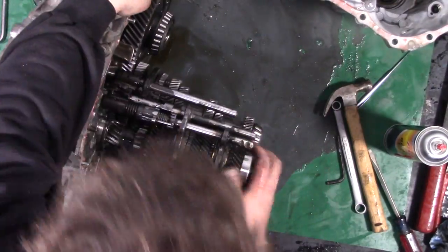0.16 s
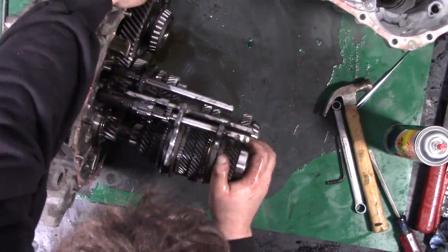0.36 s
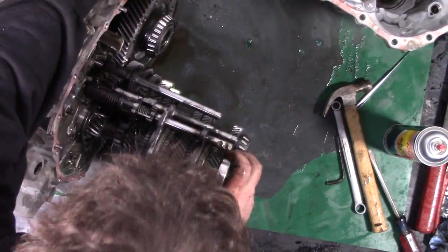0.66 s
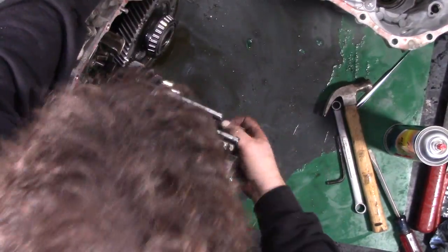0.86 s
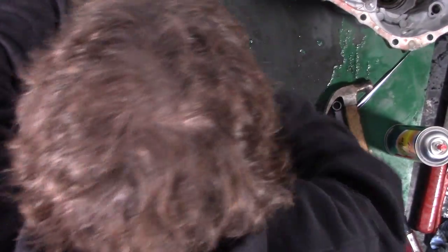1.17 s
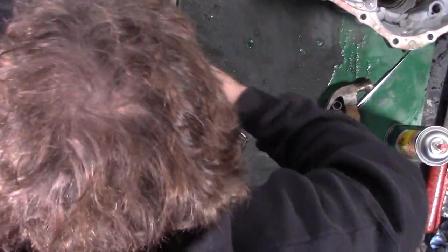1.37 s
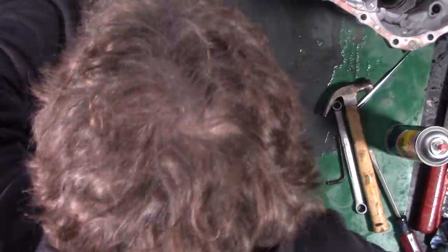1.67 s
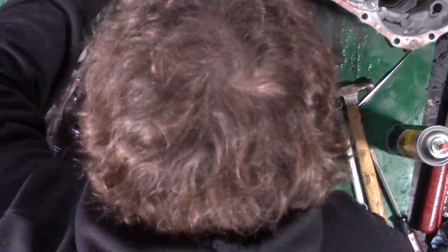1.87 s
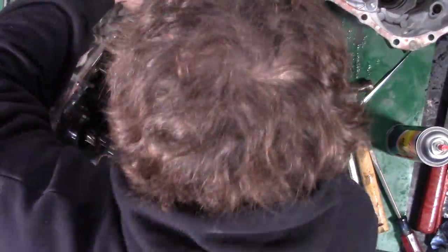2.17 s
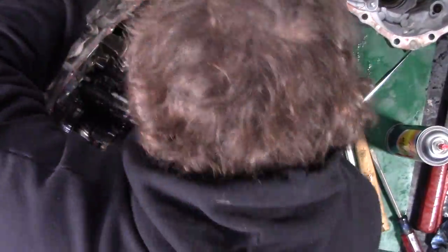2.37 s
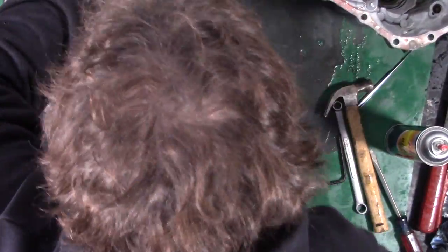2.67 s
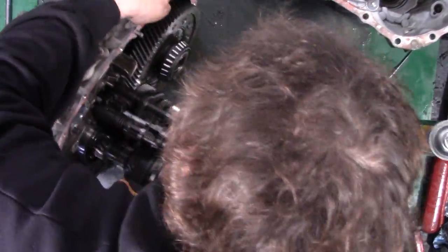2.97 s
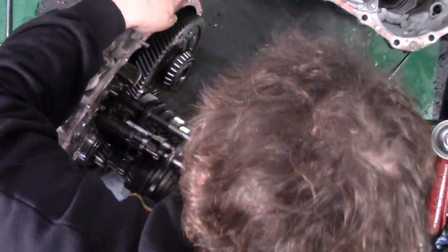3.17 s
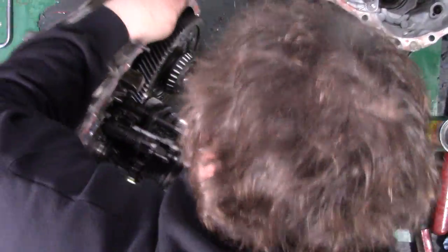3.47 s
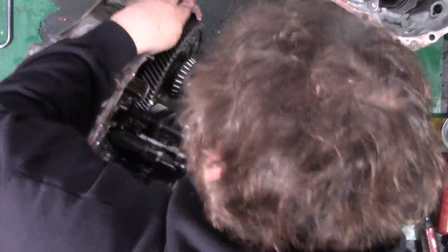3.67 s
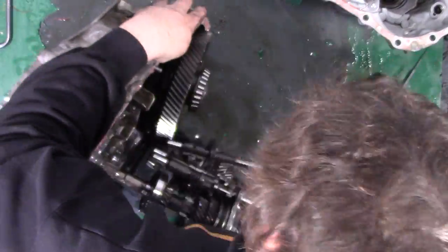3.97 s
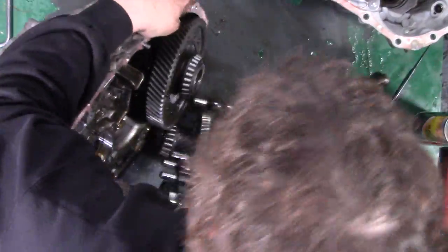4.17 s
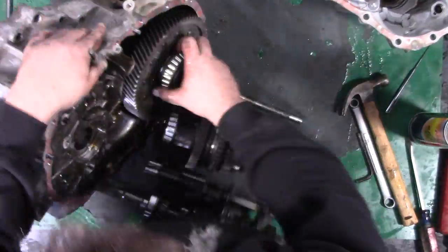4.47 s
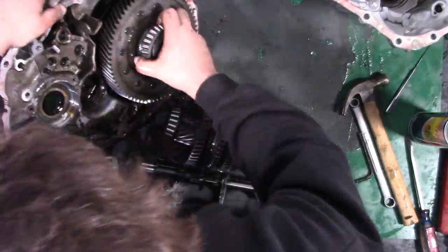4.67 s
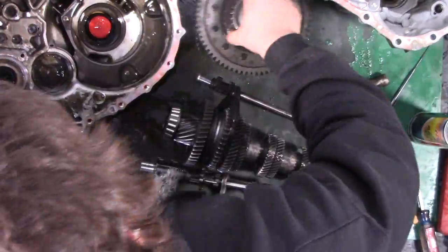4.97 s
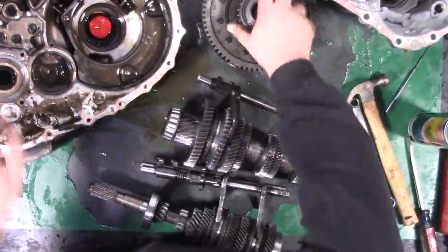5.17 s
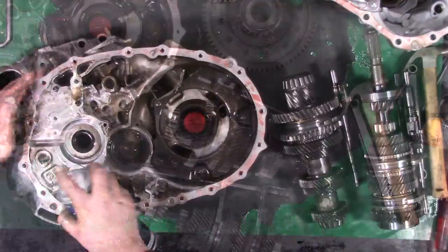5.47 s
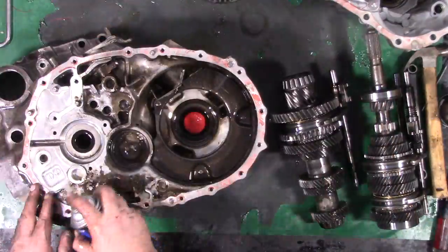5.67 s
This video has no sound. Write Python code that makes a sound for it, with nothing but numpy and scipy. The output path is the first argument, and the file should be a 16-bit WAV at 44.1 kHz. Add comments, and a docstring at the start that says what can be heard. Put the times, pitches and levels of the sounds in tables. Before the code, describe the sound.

Steel gears and shafts are worked loose from a metal case on a workbench, heard close and sped up, so each contact is a brief rattle with its ring cut short. For the first two seconds there are scattered light clinks and dull knocks, clearest near 0.6, 1 and 1.6 seconds. Firmer thuds land around 2.3 to 2.5 seconds. From about 2.7 seconds the parts clatter densely, with a dull rubbing scrape beneath them until 3.9 seconds and sharp ticks of gear teeth, brightest near 3.8. Bright rattling continues to about 4.5 seconds. A few short ringing clanks follow around 4.75, a solid knock at 5 and a faint clink at 5.3. A faint garage hum lies underneath, and everything fades out by about 5.5 seconds.

```python
"""Stripping a gearbox on a garage bench

Gear shafts and rails are worked loose from an alloy case, heard sped up so every ring is cut short.
Each contact is a brief rattle that thuds in the bench, clanks in the case and ticks in the steel teeth.
A few parts ring clear, and midway some drag along each other. The small microphone is close to the work,
with the garage humming below; the sound fades out at the end."""
import sys
import numpy as np
from scipy import signal
from scipy.fft import rfft, irfft, next_fast_len
from scipy.io import wavfile

SR = 44100
rng = np.random.default_rng(int(sys.argv[2]) if len(sys.argv) > 2 else 0)


def master_out(mix):
    """Clip the mix to full scale and print it as 16-bit PCM to the path in sys.argv[1]."""
    frames = np.transpose(np.atleast_2d(mix))
    ceiling = np.clip(frames, -1, 1)
    pcm = np.round(ceiling * 32767).astype(np.int16)
    wavfile.write(sys.argv[1], SR, pcm)


N = 257137
STEP = 32   # samples per point of a slow curve

# Dry grit of metal rubbing. Each row: frequency in Hz, relative spectral density in dB.
GRIT_SPECTRUM = [(40, -18.5), (103, -5), (250, 4), (600, -6.5), (930, -5.5), (1400, -12), (3500, -19.5),
                 (4300, -23.5), (6300, -27.5), (9300, -37), (10500, -42), (15500, -65.5)]


def from_db(db):
    """Amplitude gain of a level in dB."""
    return 10 ** (np.asarray(db) / 20)


def rms_one(x):
    """x scaled to unit rms."""
    return x / np.sqrt(np.mean(x ** 2) + 1e-20)


def in_time(rows):
    """Rows of seconds and value, joined into a curve at every sample."""
    return np.interp(np.arange(N) / SR, *np.transpose(rows))


def coloured(x, spectrum, low_hz=10, high_hz=20000):
    """x shaped by rows of Hz and dB, rolled off outside a band."""
    size = next_fast_len(N)
    hz = np.maximum(np.arange(size // 2 + 1) * SR / size, 1)
    row_hz, row_db = np.transpose(spectrum)
    gain = from_db(np.interp(np.log(hz), np.log(row_hz), row_db))
    skirts = (1 + (low_hz / hz) ** 8) * (1 + (hz / high_hz) ** 8)
    return irfft(rfft(x, size) * gain / np.sqrt(skirts), size)[:N]


def drift(rate_hz):
    """A random wander of about unit rms, mostly slower than rate_hz."""
    r = np.exp(-2 * np.pi * rate_hz * STEP / SR)
    slow = signal.lfilter([1], [1, -2 * r, r * r], rng.standard_normal(N // STEP + 2002))[2000:]
    return np.interp(np.arange(N) / STEP, np.arange(len(slow)), rms_one(slow))


def swells(peak_s, rise_ms, fall_ms):
    """One slow power curve per event: a bell-shaped rise, an exponential fall."""
    ms = 1000 * (np.arange(N // STEP + 2) * STEP / SR - peak_s[:, None])
    rise = np.minimum(ms, 0) / np.maximum(rise_ms, .3)[:, None]
    fall = np.maximum(ms, 0) / np.maximum(fall_ms, .5)[:, None]
    return np.exp(-np.minimum(rise ** 2 + fall, 60))


def amplitude(power):
    """Amplitude at every sample from a slow power curve."""
    return np.interp(np.arange(N) / STEP, np.arange(len(power)), np.sqrt(power))


def garage():
    """Room tone: a soft broadband hum whose lows and highs waver apart."""
    # Colour of the hum. Each row: frequency in Hz, relative spectral density in dB.
    hum_spectrum = [(30, -28), (70, 2), (160, -2.5), (240, 2.5), (330, -0.5), (520, -0.5), (1100, -3),
                    (2700, -8.5), (4800, -14.5), (6000, -19), (9000, -25.5), (15500, -52)]
    # Course of the hum. Each row: time in seconds, level in dB.
    hum_level = [(0, -55), (.5, -53), (2, -54), (4.2, -52), (5.35, -55)]
    lows = coloured(rng.standard_normal(N), hum_spectrum, high_hz=1209) * from_db(0.57 * drift(36.0))
    highs = coloured(rng.standard_normal(N), hum_spectrum, low_hz=1180) * from_db(0.65 * drift(11.0))
    return from_db(in_time(hum_level)) * rms_one(lows + highs)


def rattle(per_s, uneven_db):
    """Tiny knocks of uneven size at random moments; unit rms."""
    sizes = from_db(uneven_db * np.minimum(rng.exponential(1, N), 4)) * rng.choice([-1, 1], N)
    return rms_one(sizes * (rng.random(N) < per_s / SR) + 1e-9)


def resonate(x, hz, width_hz):
    """One damped mode, with unit gain at its peak."""
    r = np.exp(-np.pi * width_hz / SR)
    poles = [1, -2 * r * np.cos(2 * np.pi * hz / SR), r * r]
    return signal.lfilter([(1 - r * r) / 2, 0, (r * r - 1) / 2], poles, x)


def mode_share(modes, centre_hz, reach_octaves):
    """Power share of each mode when a contact lands where the body rings at about centre_hz."""
    octaves = np.log2(np.array(modes)[:, 0] / centre_hz[:, None])
    share = 0.16 + np.exp(-(octaves / reach_octaves) ** 2)
    return share / share.mean(axis=1, keepdims=True)


def body(shapes, level_db, modes, share, knocks, band_hz, ring_db, grit_db, spot_db=3.5):
    """Knocks ring a body's modes over dry grit; each contact hits a new spot and favours other modes."""
    favour = from_db(2 * spot_db * np.clip(rng.standard_normal((len(shapes), len(modes))), -2, 1.3))
    favour *= share / favour.mean()
    power = from_db(2 * (level_db + ring_db))
    power_gain, ring = 0, 0
    for k, (hz, width_hz, db) in enumerate(modes):
        gain = from_db(db) * (-1) ** k
        power_gain += gain ** 2 * np.pi / SR * width_hz
        force = knocks * amplitude((power * favour[:, k]) @ shapes)
        ring = ring + gain * resonate(force, hz, width_hz)
    blunt = signal.butter(4, 1.18 * band_hz[1], fs=SR, output="sos")   # blunt contacts excite no higher
    grit = rms_one(coloured(knocks + 0.84 * rng.standard_normal(N), GRIT_SPECTRUM, *band_hz))
    grit *= amplitude(from_db(2 * (level_db + grit_db)) @ shapes)
    return signal.sosfilt(blunt, ring) / np.sqrt(power_gain) + grit


def contacts():
    """Parts knock and slide: the heavy bench takes few soft knocks, the teeth many sharp ones."""
    # Each row: peak time in seconds, length in ms, then drive in dB to the bench, case and teeth.
    touches = [(0.1, 32, -62, -57, -55.5), (0.252, 31, -55, -51, -46), (0.289, 19.7, -47, -36.5, -33),
               (0.417, 5.4, -42, -60, -54), (0.454, 18, -36, -55, -65), (0.504, 16.5, -34, -46, -75),
               (0.547, 10.7, -24.5, -29.5, -50), (0.6, 11.4, -26, -34.5, -52),
               (0.722, 34.9, -47.5, -65, -52), (0.782, 12.2, -48, -44, -40.5), (0.942, 12, -26, -38, -51),
               (0.984, 35, -37.5, -47, -63), (0.989, 9.1, -42, -39, -58), (1.036, 3.6, -45, -42, -57),
               (1.05, 6.7, -35.5, -48, -52), (1.17, 15, -39, -41.5, -44.5), (1.29, 15.3, -40.5, -62, -77),
               (1.575, 7.5, -34, -38, -55), (1.589, 6.5, -23.5, -31.5, -53), (1.613, 4.6, -34, -59, -73),
               (1.716, 45, -46, -59, -80), (1.764, 3.7, -43, -40, -49), (1.776, 4.1, -40, -45, -42),
               (1.794, 25, -43, -52, -58), (1.846, 31, -40, -68, -59), (1.863, 6.2, -29, -40, -60),
               (2.22, 21, -43, -57, -68), (2.324, 15.3, -17, -34, -39.5), (2.366, 26, -29.5, -43.5, -51.5),
               (2.372, 5.1, -25.5, -30.5, -64), (2.448, 9.1, -13.5, -26.5, -38.5),
               (2.473, 20, -37, -43.5, -60.5), (2.719, 14.6, -20.5, -27.5, -43),
               (2.764, 7.6, -21.5, -37, -55.5), (2.789, 14.2, -21, -25.5, -39.5),
               (2.82, 65, -28, -38.5, -51), (2.87, 17.7, -33.5, -32, -44), (2.924, 48, -28, -29.5, -41.5),
               (2.933, 5.7, -33, -27.5, -24.5), (2.973, 43, -19, -27.5, -36.5),
               (3.031, 5, -33.5, -22.5, -49), (3.049, 4.2, -24.5, -25, -43),
               (3.089, 14.2, -17.5, -28, -39.5), (3.1, 14, -21.5, -22.5, -35),
               (3.153, 21.5, -23, -26.5, -36.5), (3.17, 42, -25.5, -37.5, -52),
               (3.198, 9.0, -29.5, -23, -39), (3.215, 12, -20, -34.5, -39.5),
               (3.241, 9.3, -25.5, -26.5, -39.5), (3.263, 13.1, -18, -25.5, -37.5),
               (3.284, 18, -21, -31, -43.5), (3.328, 32, -24, -47.5, -58), (3.345, 14.4, -24, -31, -39.5),
               (3.383, 14.3, -23.5, -34, -48), (3.412, 25, -33, -56, -43), (3.454, 8.3, -24.5, -29.5, -31),
               (3.514, 88, -27, -41, -45.5), (3.514, 10.5, -23, -23.5, -41),
               (3.564, 16.4, -18, -27.5, -41.5), (3.595, 17, -27.5, -30.5, -36.5),
               (3.617, 7.2, -26, -34.5, -34.5), (3.639, 11.3, -20, -30, -43.5),
               (3.68, 15.3, -23.5, -39.5, -35.5), (3.706, 23, -18.5, -32.5, -41),
               (3.748, 24, -17.5, -25.5, -31), (3.772, 22, -25.5, -25, -28), (3.798, 33, -28.5, -31, -41),
               (3.81, 12.4, -22.5, -23, -24), (3.91, 5.5, -34, -39.5, -33.5),
               (3.945, 24.6, -19, -24, -25.5), (3.961, 31.3, -22.5, -25, -27),
               (3.99, 18.4, -26, -24.5, -29), (4.091, 7.8, -22, -29.5, -34.5),
               (4.112, 16, -25.5, -29.5, -34), (4.155, 22.2, -21, -24, -29.5), (4.177, 20, -20, -27, -24),
               (4.197, 17.3, -23.5, -26, -38), (4.212, 17, -29.5, -31.5, -43), (4.377, 15.7, -23, -40, -45),
               (4.402, 11, -28, -36.5, -29.5), (4.427, 20.3, -18.5, -23.5, -24),
               (4.449, 12, -15.5, -29.5, -26), (4.462, 23, -22.5, -30, -44), (4.521, 17, -22, -27.5, -27),
               (4.634, 21.5, -36, -55.5, -70), (4.733, 8.6, -21.5, -23, -35),
               (4.768, 20, -38.5, -40, -52.5), (4.794, 9.5, -37, -34.5, -52), (5.001, 15.6, -15, -43, -36),
               (5.01, 19.6, -47, -26.5, -38.5), (5.032, 15.3, -25.5, -36, -46),
               (5.304, 20, -42.5, -43.5, -60), (5.359, 10.5, -51, -53, -47)]
    # Modes of the bench. Each row: frequency in Hz, bandwidth in Hz, relative gain in dB.
    bench_modes = [(79, 32, -9), (140, 38, -0.5), (173, 230, -11.5), (267.8, 75, 2), (284.4, 61, 1.5),
                   (358.5, 31.3, 1.5), (455.7, 60, -6), (489, 45, -1), (747, 93, -9.5), (762, 87, -8.5),
                   (1027, 140, -4), (1131, 97, -3.5)]
    # Modes of the alloy case, with the same columns.
    case_modes = [(1410, 180, -1.5), (1613, 100, 6), (2114, 120, -23.5), (2187, 130, -3), (2512, 100, 1.5),
                  (2624, 150, -2), (3180, 330, -3), (3340, 140, 0.5), (3790, 37, -5), (4190, 140, -10),
                  (4250, 120, -19.5)]
    # Modes of the steel teeth, with the same columns.
    teeth_modes = [(4680, 140, 0), (5014, 120, 13), (5780, 110, 8.5), (6060, 400, 7.5), (7020, 120, 2.5),
                   (7260, 140, 3), (8080, 150, -10.5), (8240, 200, -6), (9160, 130, 0.5), (9430, 110, -7),
                   (10500, 250, -18.5), (11400, 300, -27.5)]
    peak_s, length_ms, bench_db, case_db, teeth_db = np.transpose(touches)
    bench_hz = 600 * 2 ** ((case_db - bench_db) / 30)   # nearer the case, the bench rings higher
    case_hz = 3100 * 2 ** ((teeth_db - bench_db) / 37)   # nearer the teeth, the case rings higher
    sliding = np.clip((teeth_db - bench_db + 18) / 12, 0, 1)   # bright ones slide: more rasp, less ring
    rise_ms = length_ms * (0.43 + 0.06 * sliding)
    shapes = swells(peak_s, rise_ms, length_ms - rise_ms)
    bench = body(shapes, bench_db, bench_modes, mode_share(bench_modes, bench_hz, reach_octaves=0.83),
                 rattle(per_s=900, uneven_db=2.77), band_hz=(36, 1300),
                 ring_db=-2.0 - 1.9 * sliding, grit_db=-7.5 + 0.89 * sliding)
    case = body(shapes, case_db, case_modes, mode_share(case_modes, case_hz, reach_octaves=1.0),
                rattle(per_s=1400, uneven_db=3.2), band_hz=(1300, 3900),
                ring_db=-4.5 - 9.4 * sliding, grit_db=-8.5 + 3.17 * sliding)
    teeth = body(shapes, teeth_db, teeth_modes, share=0.67,
                 knocks=rattle(per_s=3000, uneven_db=3.0), band_hz=(3700, 11800),
                 ring_db=-3.5 - 3.2 * sliding, grit_db=-6.5 + 1.9 * sliding)
    return bench + case + teeth


def walls(x, t60_s):
    """Short scattered reflections off the garage walls; unit power gain."""
    t = np.arange(int(t60_s * SR)) / SR
    tail = rng.standard_normal(len(t)) * from_db(-60 * t / t60_s)
    return signal.fftconvolve(x, tail / np.sqrt(np.sum(tail ** 2)))[:N]


def ticks():
    """Tooth strikes tooth: a snap and a ring of a few ms, dulled by the oil."""
    # Each row: start in seconds, relative level in dB, pitch in Hz.
    strikes = [(0.4125, -42, 6900), (0.5885, -34, 6100), (0.606, -29, 6600), (1.0355, -33, 6400),
               (1.0502, -29, 8860), (1.2261, -42, 5840), (1.7145, -46, 8800), (1.7544, -40, 7000),
               (1.7624, -31, 6360), (1.777, -36, 8880), (1.811, -41, 7150), (2.0102, -27, 7560),
               (2.765, -25.5, 8700), (2.929, -15, 6350), (3.0767, -23, 8900), (3.1503, -19.5, 8100),
               (3.1976, -25.5, 5960), (3.238, -26, 7500), (3.3137, -31, 6100), (3.4106, -24.5, 6900),
               (3.4505, -26, 6250), (3.511, -32, 5500), (3.5576, -20.5, 5740), (3.6714, -20.5, 7130),
               (3.7651, -10, 5670), (3.8085, -10.5, 6300), (3.908, -28, 6100), (4.0584, -35.5, 5860),
               (4.0798, -24, 7060), (4.398, -21, 6040), (4.5023, -25, 5840), (4.6543, -40.5, 6170),
               (4.727, -39, 5670)]
    out = np.zeros(N)
    t = np.arange(int(0.022 * SR)) / SR
    for start_s, db, hz in strikes:
        snap = 0.45 * rng.standard_normal(len(t)) * np.exp(-t / 0.0023)
        ring = 0.22 * np.sin(2 * np.pi * hz * t) * np.exp(-t / .003)
        at = int(start_s * SR)
        out[at:at + len(t)] += from_db(db) * (ring + snap)
    return signal.sosfilt(signal.butter(3, [4500, 9800], "band", fs=SR, output="sos"), out)


def pings():
    """Single parts ring clear; the longer a part rings, the slower it builds up."""
    # Each row: peak time in seconds, time to fall 60 dB in ms, pitch in Hz, level in dB.
    partials = [(0.55, 45, 910, -31.5), (.945, 90, 897, -33), (1.17, 80, 1630, -47),
                (1.588, 65, 890, -36.5), (2.37, 90, 2465, -39), (2.789, 65, 2610, -32.5),
                (2.909, 80, 2460, -29), (3.33, 120, 3300, -42.5), (3.348, 110, 4820, -44),
                (4.18, 200, 146.6, -25.5), (4.515, 100, 8870, -40.5), (4.731, 60, 2970, -33.5),
                (4.737, 60, 964, -25.5), (4.785, 120, 1463, -36.5), (4.785, 120, 4177, -48),
                (4.788, 130, 1002, -37), (4.79, 140, 587, -33.5), (4.79, 130, 1135, -37.5),
                (5.0, 55, 214.8, -26.5), (5.301, 100, 1783, -43), (5.3, 50, 3590, -48.5)]
    peak_s, t60_ms, hz, db = np.transpose(partials)
    shapes = swells(peak_s, rise_ms=0.055 * t60_ms, fall_ms=t60_ms / np.log(1e6))
    turns = rng.random(len(partials))
    t = np.arange(N) / SR
    return sum(from_db(db[k]) * amplitude(shapes[k]) * np.sin(2 * np.pi * (hz[k] * t + turns[k]))
               for k in range(len(partials)))


def drag():
    """Parts rub along each other without a break: a dull rumble with little treble."""
    # Course of the rubbing. Each row: time in seconds, level in dB.
    rub_level = [(2.7, -81.5), (2.76, -43.5), (2.95, -30), (3.35, -40.5), (3.7, -42), (3.82, -35.5),
                 (3.88, -70)]
    rubbing = coloured(rattle(per_s=1500, uneven_db=3.4), GRIT_SPECTRUM, high_hz=3460)
    return from_db(in_time(rub_level)) * rms_one(rubbing)


def scene():
    """The bench is straight ahead; the whole sound has a slight diffuse width, wider in the treble."""
    # Stereo width. Each row: frequency in Hz, side level against mid in dB.
    width = [(60, -37.5), (250, -26.5), (700, -24.5), (2000, -18.5), (6000, -16.5), (14000, -15.5)]
    work = contacts() + drag() + ticks() + pings()
    mid = work + from_db(-22.0) * walls(work, t60_s=0.18) + garage()
    side = coloured(mid * drift(250.0), width)
    return np.array([mid + side, mid - side]) * from_db([[.15], [-.15]])


def record(dry):
    """The small microphone drops the deep bass; the sound fades out and the highest treble is cut."""
    # The fader, steady until the close. Each row: time in seconds, gain in dB.
    fader = [(5.3, 5.5), (5.4, 5.5), (5.48, 0), (5.52, -5), (5.545, -21), (5.565, -50.5), (5.575, -90)]
    bass_cut = signal.butter(1, 90, "high", fs=SR, output="sos")
    treble_cut = signal.cheby2(12, 70, 16400, fs=SR, output="sos")
    heard = signal.sosfilt(bass_cut, dry) * from_db(in_time(fader))
    return signal.sosfilt(treble_cut, heard)


dry = scene()
out = record(dry)
master_out(out)
```